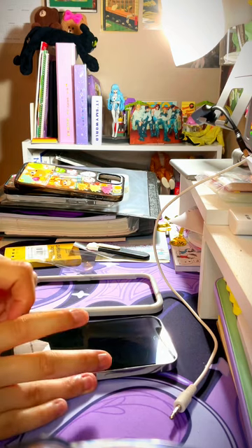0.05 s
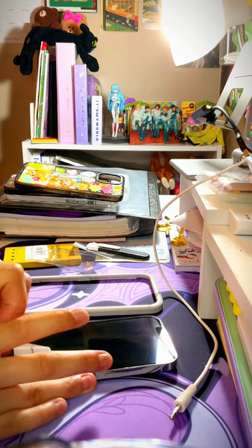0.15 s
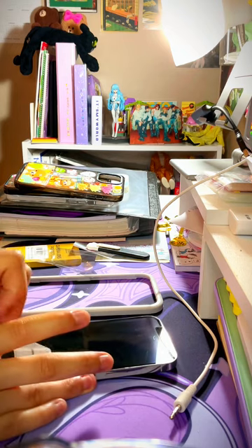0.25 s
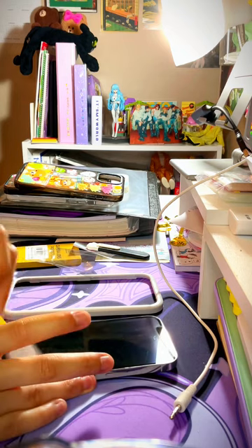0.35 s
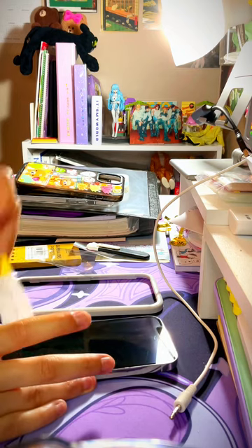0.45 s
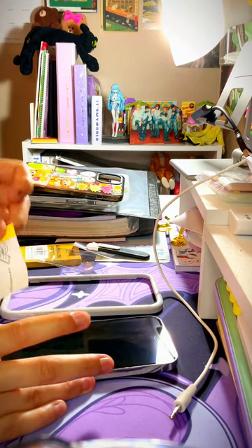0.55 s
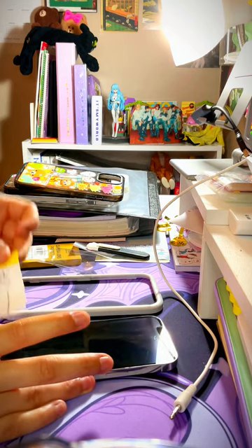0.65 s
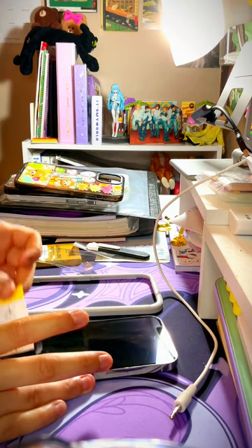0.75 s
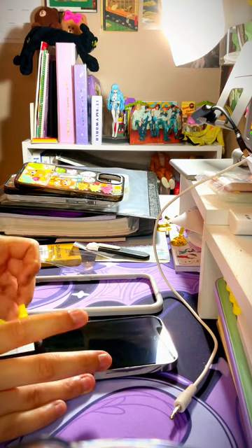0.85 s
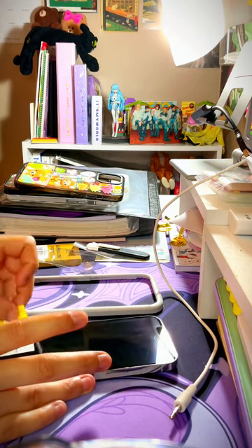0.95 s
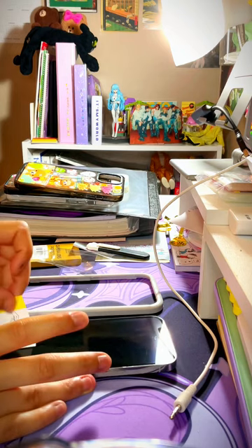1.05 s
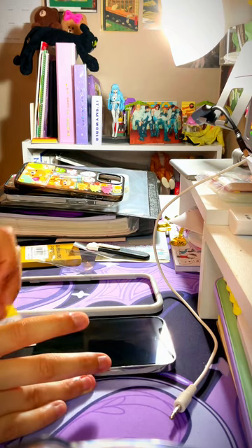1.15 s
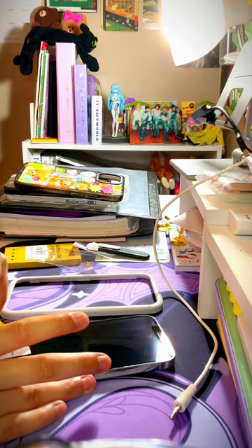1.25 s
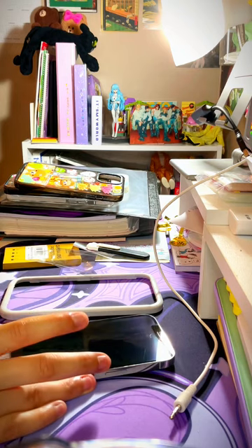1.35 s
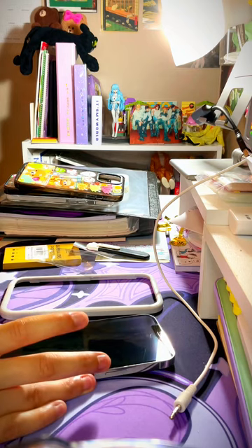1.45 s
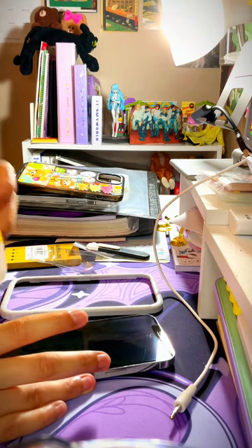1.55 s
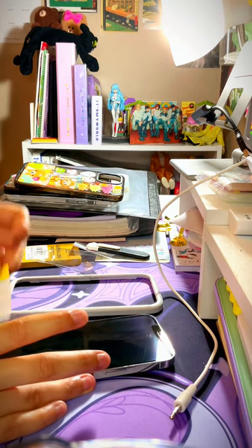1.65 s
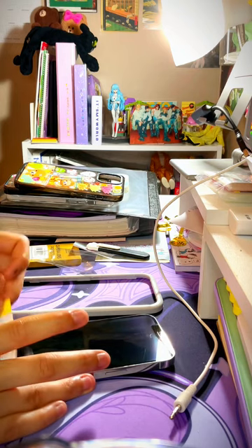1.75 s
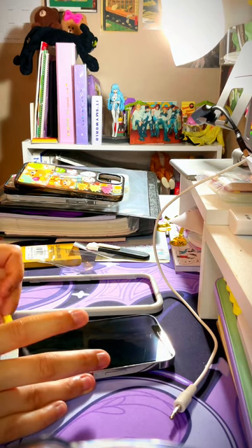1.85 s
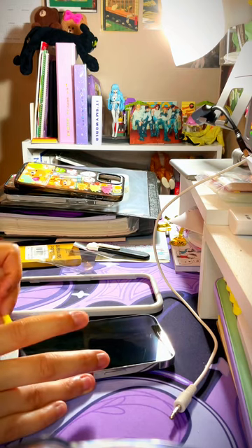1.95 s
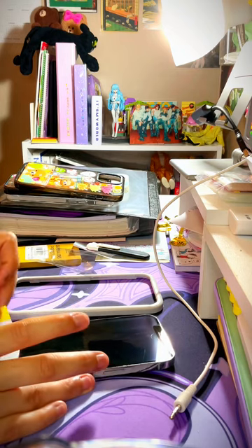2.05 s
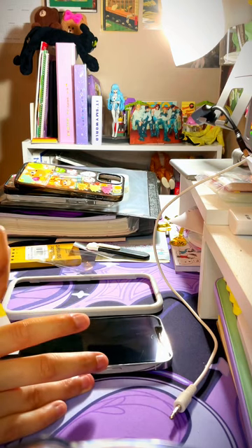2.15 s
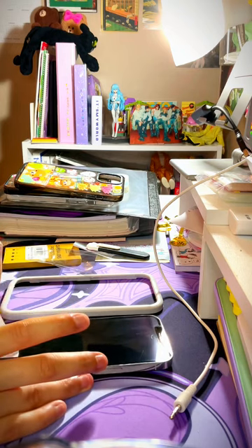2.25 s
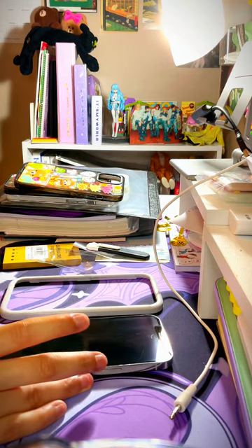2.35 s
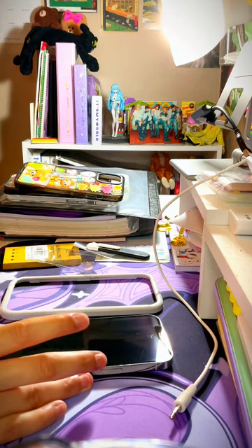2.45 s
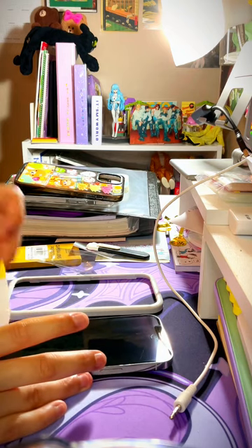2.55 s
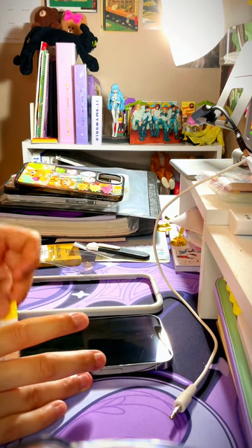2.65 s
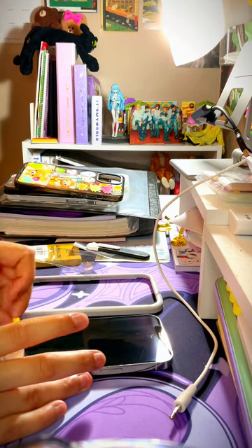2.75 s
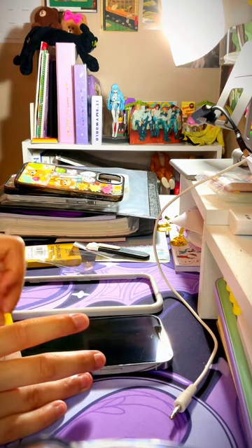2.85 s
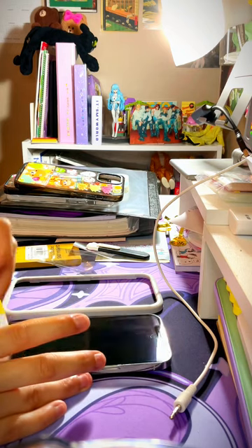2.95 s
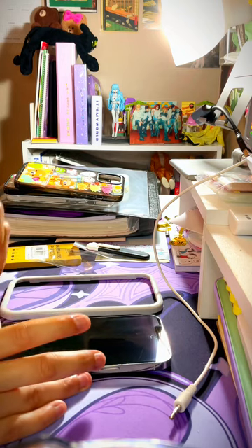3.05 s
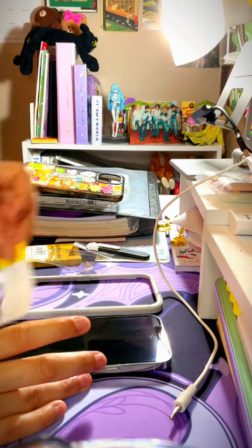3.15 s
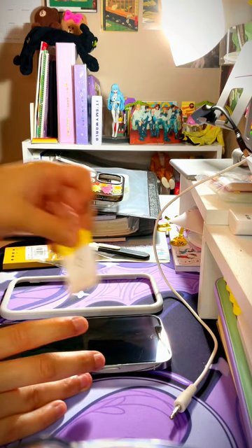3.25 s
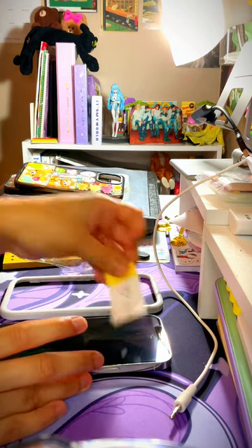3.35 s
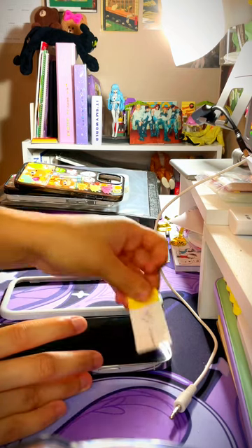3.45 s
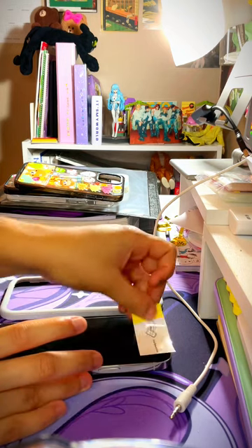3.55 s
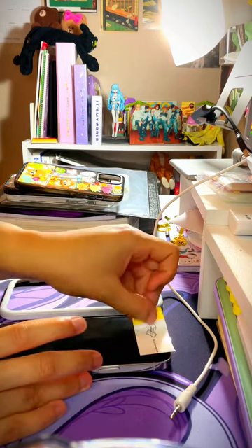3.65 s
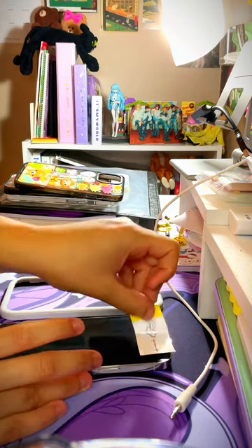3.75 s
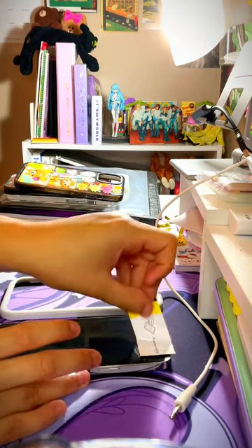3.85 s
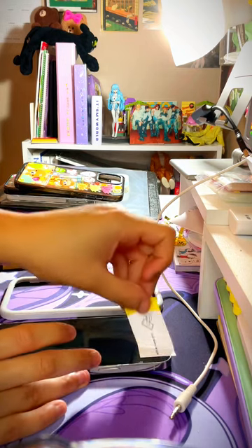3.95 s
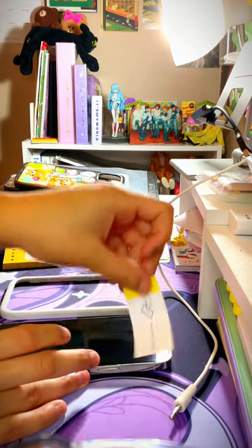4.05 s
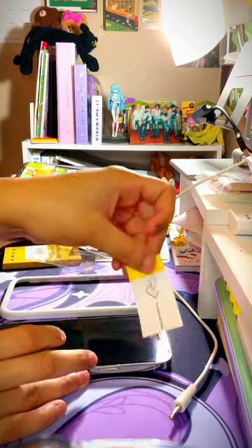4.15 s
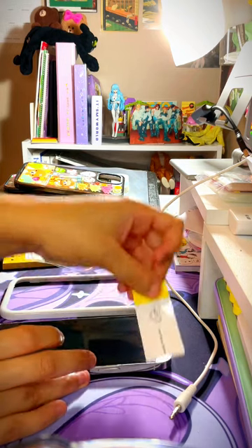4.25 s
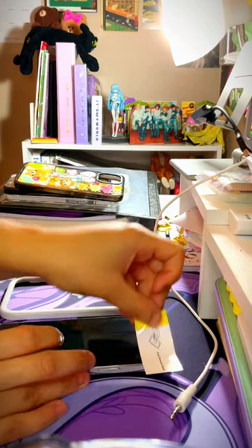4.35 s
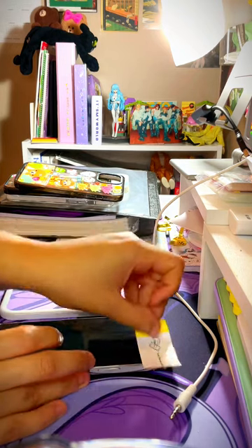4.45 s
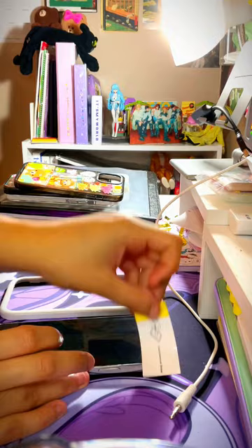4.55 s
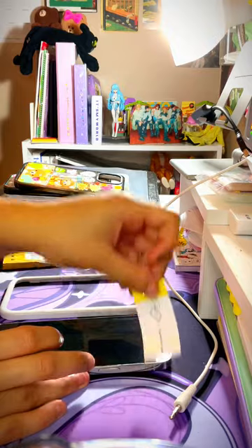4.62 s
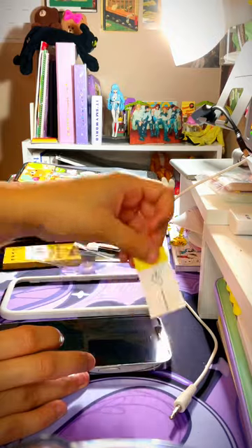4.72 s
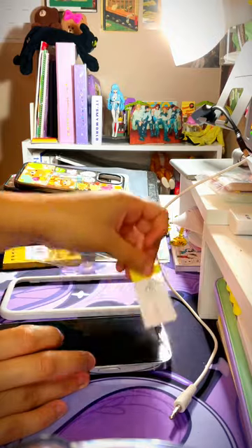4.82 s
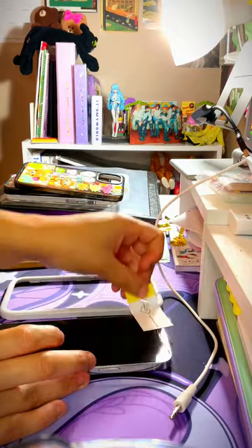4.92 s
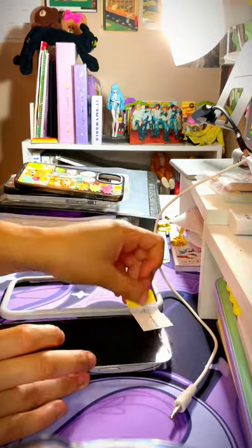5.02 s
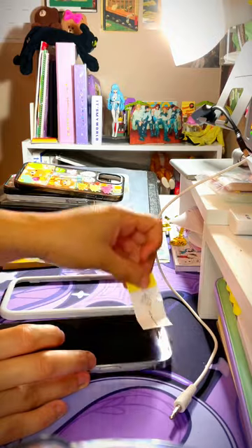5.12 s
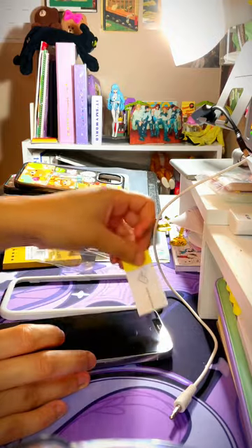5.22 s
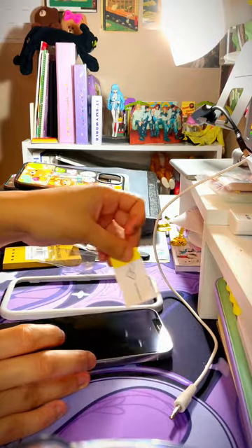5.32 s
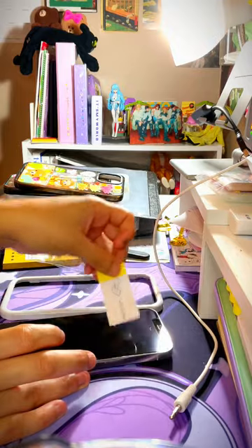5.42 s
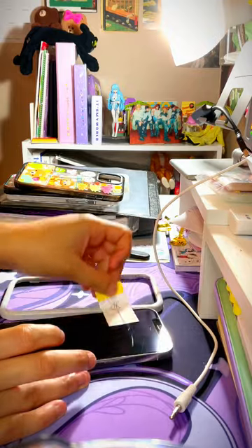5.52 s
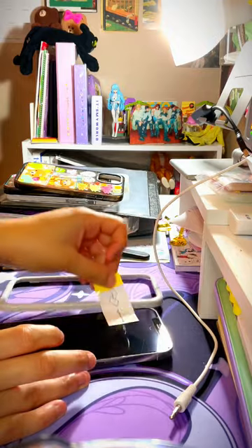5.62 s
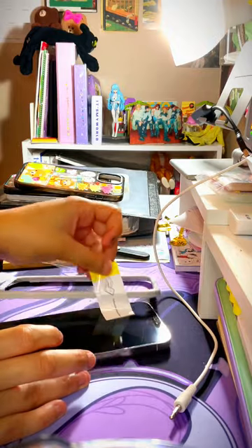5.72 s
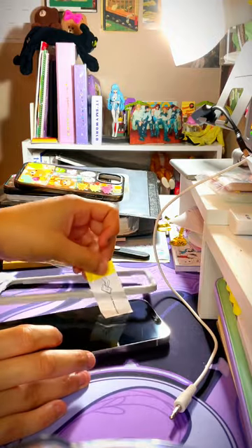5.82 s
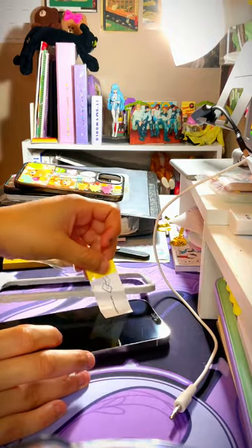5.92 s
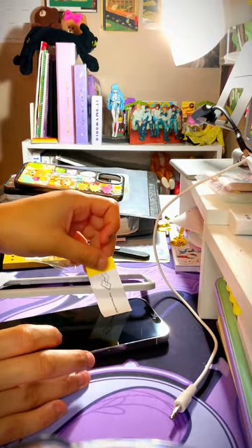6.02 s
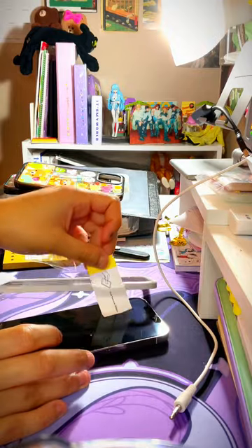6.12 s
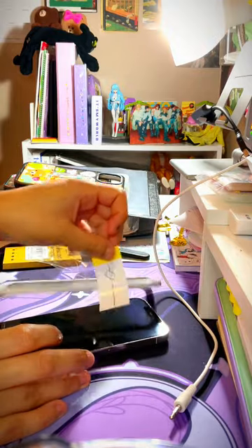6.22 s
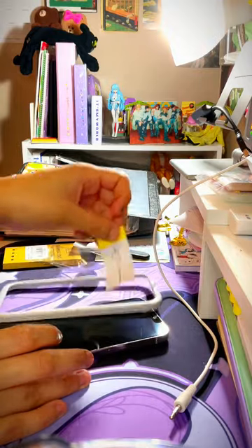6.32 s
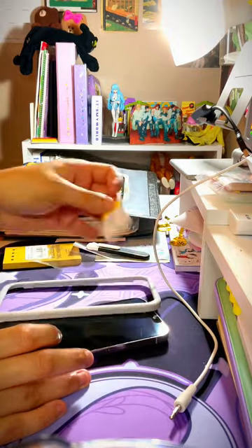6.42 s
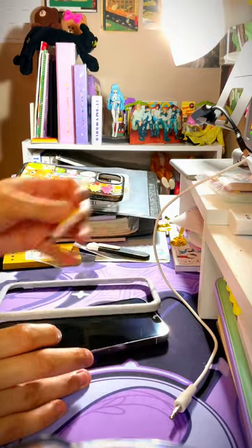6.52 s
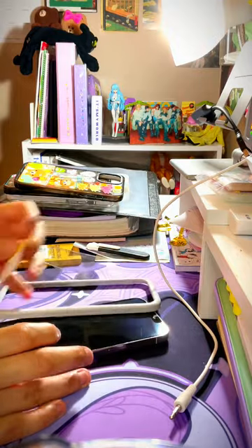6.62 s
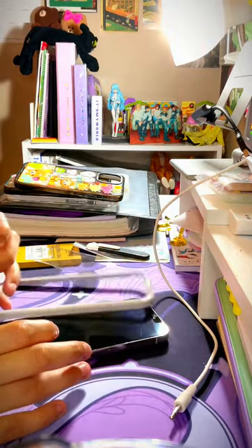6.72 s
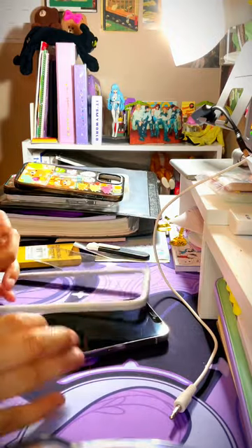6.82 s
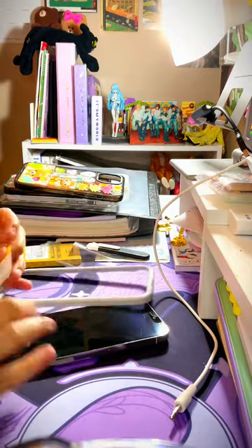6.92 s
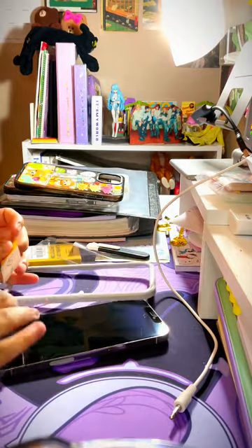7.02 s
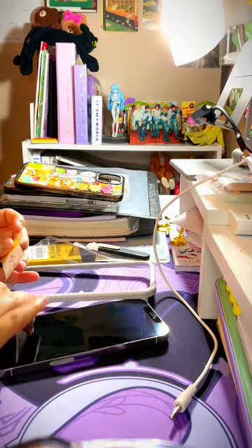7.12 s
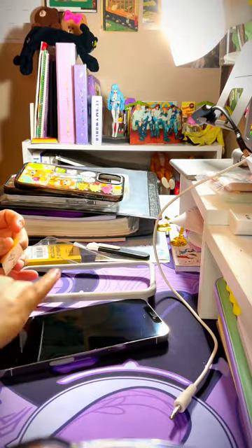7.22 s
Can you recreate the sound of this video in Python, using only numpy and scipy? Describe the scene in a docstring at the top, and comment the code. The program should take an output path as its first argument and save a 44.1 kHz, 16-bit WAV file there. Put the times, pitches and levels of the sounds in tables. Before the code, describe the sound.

A small sticky sheet is dabbed on phone glass and peeled off in dry clicks and crackles, then stiff plastic snaps and rustles.

```python
"""A dust sticker is dabbed on a phone screen and plucked off again, at a desk in a small, quiet room.
Breaking glue crackles in noise bursts, each popping the little sheet as a damped swing and nudging
the phone; between dabs the sticker creases in faint ticks, and low thuds sound with some dabs, buckles
and hand movements. Then a stiff plastic sheet snaps, buckles with ringing modes and rustles in clumped
noise as it is taken up. Random echoes form the room; coloured noise is its air throughout."""
import sys
import numpy as np
from scipy import signal
from scipy.fft import rfft, irfft, next_fast_len
from scipy.io import wavfile
from scipy.ndimage import uniform_filter1d

SR = 44100
rng = np.random.default_rng(int(sys.argv[2]) if len(sys.argv) > 2 else 0)


def generate_wav(signal):
    """Clip the signal to [-1, 1] and save it as 16-bit WAV at the path in sys.argv[1]."""
    frames = np.transpose(np.atleast_2d(signal))
    scaled = np.clip(frames, -1, 1) * 32767
    pcm = np.round(scaled).astype(np.int16)
    wavfile.write(sys.argv[1], SR, pcm)


N = 320955
TIME = np.arange(N) / SR  # s
HIT_T = np.arange(4096) / SR  # s, the time axis of every short hit

# sticker touching the glass or letting go:
# (t/s, burst time scale/ms, crack level/dB, body level/dB re crack, fizz level/dB re crack)
DABS = [(0.3337, 1.6, -36.5, 1.5, -1), (.3625, 2.1, -46, -10, 0), (.9026, 1.34, -27.5, -32, -11),
        (.983, 0.49, -51, -14, 10), (0.9863, 2.1, -43, -24, 8.5), (.9951, .8, -41, -19, 0),
        (1.0076, 2.3, -29.5, -19.5, -5), (1.0472, 1.1, -27, -11, -5.5), (1.106, 1.2, -34, -0.5, -1.5),
        (1.3501, 1.9, -50, -16, 1), (1.3542, 2.8, -35, 1, -2), (2.023, 3.07, -55, -6.5, -3),
        (2.033, 0.35, -48.5, -9.5, -0.5), (2.1546, 1.1, -41.5, -5, -3), (2.1603, 6.3, -57.5, 12.5, -2),
        (2.269, 1, -52.5, -7, 5.5), (2.3133, 1.2, -53, -23, 0), (2.3479, 1.8, -35, -4, -1),
        (2.7211, 0.95, -51, -11.5, -16), (2.9469, 2.8, -40.5, -4.5, -7), (2.959, 5.3, -36.5, -4.5, -2),
        (2.972, 10.4, -37.5, -5, -0.5), (2.9883, 4.6, -45.5, -0.5, -1.5), (4.0172, 1.2, -42.5, -4, 4.5),
        (4.0331, 2.1, -34, -2, -3), (4.0692, 1.38, -48.5, 0.5, -27), (4.4335, 5.2, -50, -7, 0.5),
        (4.5397, 0.84, -36.5, -8.5, 0), (4.546, 2.1, -34, -4.5, 3), (4.5648, 1.4, -43.5, -14, 1),
        (4.574, 1.9, -36, -8, -1), (4.5824, 2, -35.5, -3, 1), (5.119, 0.91, -35, -12.5, 7.5),
        (5.1275, 3.4, -35, -17, 1), (5.162, .55, -48.5, -9.5, -3.5), (5.1792, .8, -42, -18.5, -8),
        (5.183, 0.71, -31, -12.5, 1), (5.2008, 5, -44.5, -5.5, 1), (5.2208, 1.7, -34, -4, -4),
        (5.6342, 3.5, -47, -20, 0), (5.6401, 2.1, -33.5, -15.5, -3.5), (5.662, 4.9, -39, -25.5, -1.5),
        (5.7316, 0.61, -51, -1.5, 1.5), (5.802, 0.68, -49, -2.5, -8), (6.1476, 2.28, -50.5, -4.5, -5.5),
        (6.1875, 2.7, -42.5, 4, -0.5), (6.229, 1.5, -56.5, 2.5, -11)]
# how the sticker radiates: (f/Hz, level/dB)
STICKER_COLOUR = [(300, -0.5), (750, 3.5), (1300, 3), (1600, -3.5), (2100, -2.5), (2600, -3.5), (3400, 0),
                  (4600, 0.5), (6300, -1), (8500, 1), (10500, -3), (15500, -6)]
# the sticker's highest treble, which beams as it is turned: (t/s, level/dB at 14 kHz)
FACING = [(.3, 2), (.9, -3), (1.05, 0), (2.3, 6), (3, 3), (4, 1), (5.1, -6), (5.7, 0), (6.2, 7)]
# the more of the sticker flexes, the lower it sounds; POP_HZ holds at a pop of FIRM_POP_DB
POP_HZ, FIRM_POP_DB, POP_OCTAVES_PER_DB = 966, -36, .012
CRACK_HZ, CRACK_OCTAVES_PER_DB = 3574, .013  # CRACK_HZ holds at a body of 0 dB


def sticker():
    """Glue snaps off the glass and pops the little sheet; a bigger flex sounds lower."""
    out = np.zeros(N)
    for s, ms, crack_db, body_db, fizz_db in DABS:
        pop_db = crack_db + body_db
        pop_hz = POP_HZ * 2 ** (POP_OCTAVES_PER_DB * (FIRM_POP_DB - pop_db))
        crack_hz = CRACK_HZ * 2 ** (-CRACK_OCTAVES_PER_DB * body_db)
        dab = snap(ms, pop_hz, pop_db, crack_hz, crack_db, crack_db + fizz_db,
                   STICKER_COLOUR, cycles=.32, lag_s=.00019)
        facing_db = np.interp(s, *np.transpose(FACING))
        add(out, s, colour(dab, [(9000, 0), (14000, facing_db)]))
    return out


# plastic sheet buckling: (t/s, burst time scale/ms, crack level/dB, body level/dB re crack)
FLEXES = [(6.31, 2.1, -27.5, 6.5), (6.314, 1.9, -29.5, -8), (6.3438, 3.4, -40.5, -15),
          (6.3684, 5, -40, -19), (6.3756, 5.6, -43, 9.5), (6.3825, 2.9, -44, 9), (6.4183, 3.6, -44.5, -10),
          (6.4395, 3.4, -43, 10), (6.4574, 4.3, -38.5, 1.5), (6.4771, 4.3, -39.5, 8), (6.485, 5, -47, 12.5),
          (6.5779, 2.1, -59, 6), (6.7295, 1.2, -35.5, -6), (6.7627, 4.3, -48, -10),
          (6.8445, 3.9, -38, -10.5), (6.8947, 6, -46.5, -2), (6.926, 2.8, -48.5, -11)]
# how the plastic sheet radiates: (f/Hz, level/dB)
PLASTIC_COLOUR = [(300, -20), (540, -9.5), (670, 2.5), (1300, 2.5), (1550, -6.5), (3000, -0.5), (4000, -7),
                  (5400, -4), (7000, 0.5), (8800, 3.5), (10000, -8.5), (12500, -11.5), (15500, -17)]
# ring of the plastic sheet: (f/Hz, level/dB re its drive, t60/s)
PLASTIC_MODES = [(726, -13.5, 0.047), (926, -24.5, 0.046), (1180, -15, 0.054), (1990, -27.5, .06),
                 (7800, -23, 0.061), (8700, -17, 0.0602), (8780, -7, 0.044), (8570, -18, .05)]
# from GRIP_S on, the fingers close on the sheet and damp its high ring by GRIP_DB
GRIP_S, GRIP_DB = 6.65, -22
LOOSE_POP_HZ, GRIPPED_POP_HZ = 1030, 730  # the sheet pops lower once the fingers load it
FLEX_CRACK_HZ = 3390
# fizz re crack, for a buckle of FIRM_FLEX_DB or harder
LOOSE_FIZZ_DB, GRIPPED_FIZZ_DB = 3.5, -1.5
FIRM_FLEX_DB, WEAK_FLEX_DULLING = -42.5, 1.2  # weaker buckles lose this much fizz (dB per dB)


def plastic():
    """Each buckle cracks and sets the stiff sheet ringing: low modes follow the pop, high ones the fizz."""
    out = np.zeros(N)
    for s, ms, crack_db, body_db in FLEXES:
        gripped = s > GRIP_S
        pop_hz = GRIPPED_POP_HZ if gripped else LOOSE_POP_HZ
        pop_db = crack_db + body_db
        dulling_db = WEAK_FLEX_DULLING * max(FIRM_FLEX_DB - crack_db, 0)
        fizz_db = crack_db + (GRIPPED_FIZZ_DB if gripped else LOOSE_FIZZ_DB) - dulling_db
        buckle = snap(ms, pop_hz, pop_db, FLEX_CRACK_HZ, crack_db, fizz_db,
                      PLASTIC_COLOUR, cycles=.61, lag_s=.00017)
        add(out, s, buckle)
        bends = 1 + .001 * rng.standard_normal(len(PLASTIC_MODES))  # each ring is slightly detuned
        for (hz, mode_db, t60), bend in zip(PLASTIC_MODES, bends):
            if hz < 4000:
                # a low mode rings best when the pop lands near its pitch
                drive_db = pop_db + 7 * np.exp(-(np.log(hz / pop_hz) / .1) ** 2)
            else:
                drive_db = fizz_db + GRIP_DB * gripped
            ring = np.sin(2 * np.pi * hz * bend * HIT_T) * fade(HIT_T, t60)
            add(out, s, hit_level(ring, mode_db + drive_db))
    return out


def snap(ms, pop_hz, pop_db, crack_hz, crack_db, fizz_db, sheet_colour, cycles, lag_s):
    """A sharp first break and a short avalanche of smaller ones, while the whole sheet pops."""
    age = HIT_T / (ms / 1000)
    avalanche = grains(len(HIT_T), spread_db=6.5) * np.exp(-.44 * age ** 1.41)
    shiver = .11 * rng.standard_normal(len(HIT_T)) * fade(HIT_T, .048)
    burst = unit(avalanche + shiver)
    burst[0] += .3  # the first break
    burst = colour(burst, sheet_colour)
    # a crack pitched high has little body: its lower edge climbs quickly with pitch
    crack_low_hz = 2350 * (crack_hz / 4400) ** 2.22
    crack = band(burst, crack_low_hz, 1.52 * crack_hz, order=3)
    fizz = band(burst, 6500, 16500, order=3)
    flutter_noise = rng.standard_normal(len(HIT_T)) * fade(HIT_T, .015)
    flutter = unit(band(flutter_noise, .59 * pop_hz, 1.84 * pop_hz))
    pop = colour(swing(pop_hz, cycles) + flutter, sheet_colour)
    pop = np.roll(pop, int(lag_s * SR))  # the pop trails the crack by a hair
    return hit_level(pop, pop_db) + hit_level(crack, crack_db) + hit_level(fizz, fizz_db)


# plastic sliding over the fingers: (t/s at full level, length/s, level/dB)
SLIDES = [(6.318, 0.033, -47), (6.429, 0.047, -49), (6.739, 0.043, -49.5), (6.843, 0.057, -59.5),
          (6.925, 0.092, -53)]
# colour of the sliding plastic: (f/Hz, level/dB)
SLIDE_COLOUR = [(300, -12), (580, -10), (720, 2.5), (900, -14.5), (1400, -2.5), (2000, -7), (3100, -5),
                (5500, -12.5), (8500, -11), (10500, -15), (15000, -20.5)]
SLIDE_ATTACK_S = .016  # the slide swells up to its start over this time
SLIDE_RELEASE_RATIO = 3.3  # the fade (t60) lasts this many times the length of the slide
CLUMP_DB, CLUMP_FALL_DB_PER_OCTAVE = 6.5, 1.14  # swell of the lowest band; treble hisses more evenly


def rustle():
    """Plastic catches and slips on the fingers; each band of its grain swells in uneven clumps."""
    grain = np.zeros(N)
    for octave in np.arange(0, 5.5, .5):
        low_hz = 350 * 2. ** octave
        catch = uniform_filter1d(rng.standard_normal(N), size=600)
        clump_db = (CLUMP_DB - CLUMP_FALL_DB_PER_OCTAVE * octave) * catch / np.std(catch)
        ticks = grains(N, spread_db=6.5) * undb(clump_db)
        grain += band(ticks, low_hz, np.sqrt(2) * low_hz)
    grain = colour(grain, SLIDE_COLOUR)
    pressure = np.zeros(N)
    for s, length, db in SLIDES:
        attack = np.clip(1 + (TIME - s) / SLIDE_ATTACK_S, 0, 1)
        release = fade(np.maximum(TIME - s - length, 0), SLIDE_RELEASE_RATIO * length)
        pressure += undb(db) * attack * release
    return grain / np.std(grain) * pressure


# sticker creasing between the fingers: (t/s, length/s, level/dB before the band-pass)
CREASES = [(0.101, 0.065, -77), (.77, 0.067, -86), (1.495, 0.022, -66.5), (2.222, 0.049, -69),
           (2.711, 0.12, -81.5), (3.778, 0.03, -66.5), (3.79, .14, -76), (3.935, 0.087, -59.5),
           (4.78, .12, -87), (5.604, 0.066, -59), (5.828, .028, -70.5), (5.97, 0.13, -70.5),
           (6.13, 0.065, -65), (6.225, 0.12, -72)]


def creases():
    """Between dabs the sticker creases in faint, scattered ticks of very unequal strength."""
    out = np.zeros(N)
    for s, length, db in CREASES:
        size = int(length * SR)
        ticks = grains(size, spread_db=15) * np.sin(np.linspace(0, np.pi, size))
        add(out, s, undb(db) * band(ticks / np.std(ticks), 4500, 15500))
    return out


# low thuds under some dabs and buckles, and of the handling hand: (t/s, f/Hz, peak level/dB)
THUDS = [(.566, 191, -49), (1.053, 108, -47.5), (1.108, 112, -45), (2.934, 121, -42.5), (2.964, 135, -37.5),
         (2.993, 113, -33.5), (3.015, 220, -50), (3.06, 215, -58), (4.035, 160, -43.5), (6.32, 133, -46),
         (6.382, 213, -40), (6.44, 211, -42.5), (6.804, 160, -49.5), (6.858, 119, -47.5),
         (6.911, 120, -41.5)]
# the phone is dull at the end the fingers hold down and knocks firmer at the free end
HELD_END_HZ, HELD_END_DB = 175, -14  # dB re pop
FREE_END_HZ, FREE_END_DB = 340, -2.8  # dB re pop
FREE_END_S = 3.3  # later pops are at the free end


def desk():
    """Every sticker pop nudges the phone on its mat; low thuds join some dabs, buckles and hand movements."""
    out = np.zeros(N)
    for s, _, crack_db, body_db, _ in DABS:
        at_free_end = s > FREE_END_S
        hz = FREE_END_HZ if at_free_end else HELD_END_HZ
        nudge_db = FREE_END_DB if at_free_end else HELD_END_DB
        add(out, s, thud(hz, crack_db + body_db + nudge_db, cycles=.35, knock=.81))
    for s, hz, db in THUDS:
        add(out, s, thud(hz, db, cycles=.67, knock=.41))
    return out


def thud(hz, peak_db, cycles, knock):
    """A short, dull swing of the padded desk with a little rattle around and above it."""
    rattle = band(rng.standard_normal(len(HIT_T)) * fade(HIT_T, .12), .87 * hz, 2.3 * hz)
    x = swing(hz, cycles) + knock * unit(rattle)
    return x / np.abs(x).max() * undb(peak_db)


ROOM_STEP_S = .25  # each step has its own echo pattern


def room(x):
    """The hands keep moving, so the pattern of echoes changes from moment to moment."""
    out = x.copy()
    step = int(ROOM_STEP_S * SR)
    for centre in range(0, N + step, step):
        start = max(centre - step, 0)
        piece = x[start:centre + step]
        # neighbouring pieces crossfade at constant power
        share = 1 - np.abs(start + np.arange(len(piece)) - centre) / step
        add(out, start / SR, signal.fftconvolve(piece * np.sqrt(share), echoes()))
    return out


# colour of the room's tail: (f/Hz, level/dB)
ROOM_COLOUR = [(100, 11), (250, 10), (500, -6), (1000, -2.5), (2000, -2.5), (5000, 0), (9000, 0.5),
               (15000, 3.5)]
TAIL_DB, EARLY_DB = -11.5, -12  # tail energy re the direct sound; early echoes likewise
TAIL_BANDS = [(50, 450, .2), (450, 6500, .18), (6500, 18000, .17)]  # (low f/Hz, high f/Hz, t60/s)


def echoes():
    """Nearby shelves scatter the sound at once; the furnished room adds a short tail."""
    t = np.arange(3 * len(HIT_T)) / SR
    noise = rng.standard_normal(len(t))
    tail = sum(band(noise, lo, hi, order=4) * fade(t, t60) for lo, hi, t60 in TAIL_BANDS)
    tail_onset = np.clip((t - .003) / .0036, 0, 1)
    tail = unit(colour(tail * tail_onset, ROOM_COLOUR))
    early = unit(grains(len(t), spread_db=4) * np.exp(-((t - .0095) / .0056) ** 2))
    return undb(TAIL_DB) * tail + undb(EARLY_DB) * early


# colour of the room's air: (f/Hz, level/dB)
AIR_COLOUR = [(15, -51), (25, -15.5), (40, -8.5), (86, 0), (142, -2), (167, -9), (207, -13), (237, -2.5),
              (264, -14.5), (404, -12.5), (438, -15.5), (637, -13.5), (691, -18), (1280, -7), (2020, -16),
              (4150, -21), (6040, -29), (7480, -43), (8320, -38.5), (10300, -53.5), (15000, -54)]
AIR_DB, HISS_DB = -62, -91  # rms; the hiss before its band-pass


def air():
    """Steady, soft room noise and the microphone's faint hiss."""
    murmur = colour(rng.standard_normal(N), AIR_COLOUR)
    hiss = band(rng.standard_normal(N), 5000, 13500)
    return murmur / np.std(murmur) * undb(AIR_DB) + undb(HISS_DB) * hiss


def swing(hz, cycles):
    """A damped flexing motion that builds up and dies within a few cycles."""
    age = HIT_T * hz / cycles
    return unit(age * np.exp(-age) * np.sin(2 * np.pi * hz * HIT_T))


def grains(size, spread_db):
    """Crackle of unit rms: countless tiny ticks of very unequal strength."""
    x = rng.standard_normal(size) * undb(spread_db * rng.standard_normal(size))
    return x / np.std(x)


def fade(t, t60):
    """Exponential decay by 60 dB in t60 seconds."""
    return np.exp(-np.log(1000) * t / t60)


def band(x, lo_hz, hi_hz, order=2):
    """Causal band-pass."""
    edges = [lo_hz, min(hi_hz, SR / 2 - 100)]
    return signal.sosfilt(signal.butter(order, edges, "band", fs=SR, output="sos"), x)


def colour(x, points):
    """Causal filter through (f/Hz, level/dB) points, built from the cepstrum."""
    size = 2 * next_fast_len(len(x))
    hz, db = np.transpose(points)
    bin_hz = np.arange(size // 2 + 1) * SR / size
    gain_db = np.interp(np.log(bin_hz + 1), np.log(hz), db)
    cepstrum = irfft(gain_db * np.log(10) / 20)
    # folding the cepstrum onto positive times makes the filter minimum-phase
    cepstrum[1:size // 2] *= 2
    cepstrum[size // 2 + 1:] = 0
    return irfft(rfft(x, size) * np.exp(rfft(cepstrum)))[:len(x)]


def undb(db):
    """Decibels to gain."""
    return 10 ** (np.asarray(db) / 20)


def unit(x):
    """Scale to unit energy."""
    return x / np.sqrt(np.sum(x ** 2) + 1e-18)


def hit_level(x, db):
    """Scale a short sound so that its energy equals that rms level held for 5 ms."""
    return unit(x) * np.sqrt(.005 * SR) * undb(db)


def add(out, s, x):
    """Mix x into out at time s."""
    i = max(int(s * SR), 0)
    out[i:i + len(x)] += x[:max(N - i, 0)]


def scene():
    """All the handling sounds in the room, over its quiet air."""
    handling = sticker() + plastic() + rustle() + creases() + desk()
    return (room(handling) + air())[None]


def record(dry):
    """The small microphone loses the deepest bass; the top is cut steeply above 16.1 kHz."""
    thin = signal.sosfilt(signal.butter(4, 46, "high", fs=SR, output="sos"), dry)
    return signal.sosfilt(signal.ellip(8, .2, 80, 16100, fs=SR, output="sos"), thin)


dry = scene()
out = record(dry)
generate_wav(out)
```